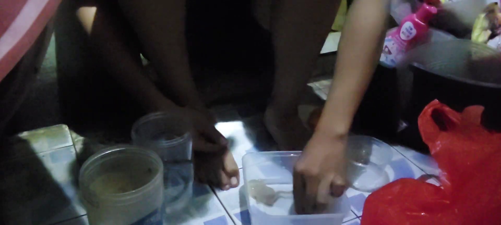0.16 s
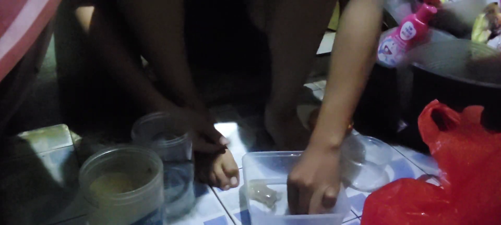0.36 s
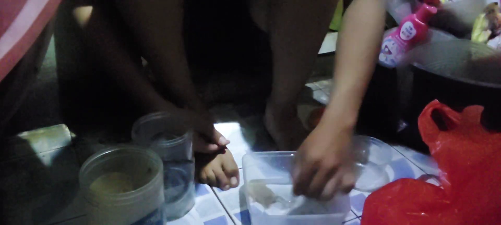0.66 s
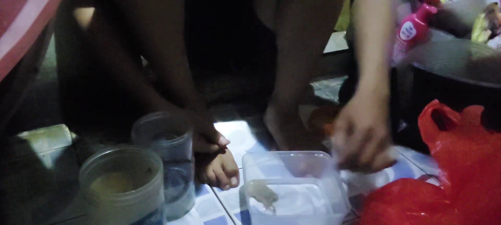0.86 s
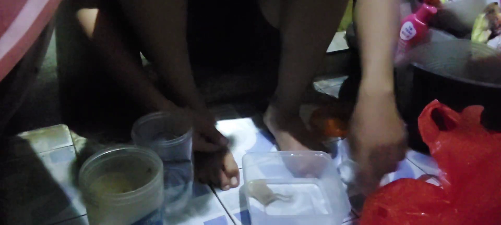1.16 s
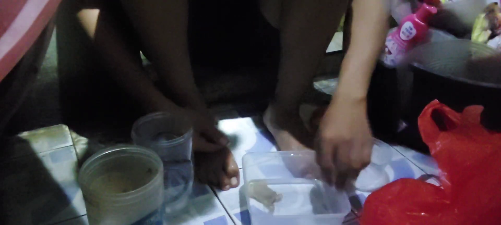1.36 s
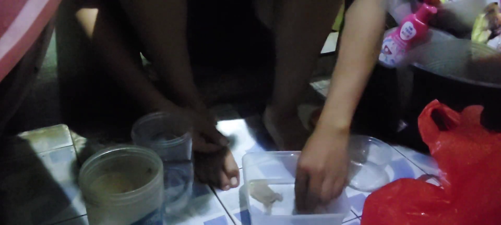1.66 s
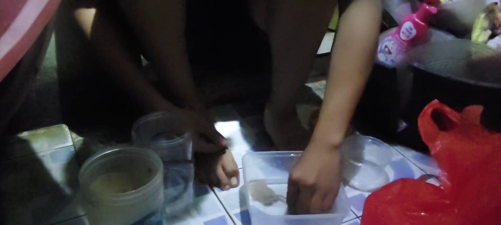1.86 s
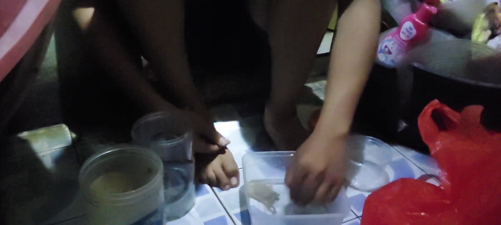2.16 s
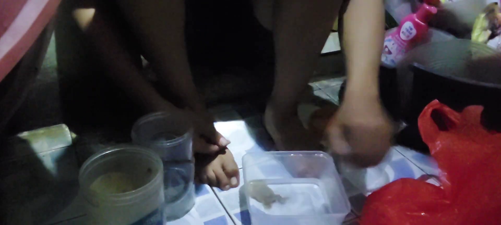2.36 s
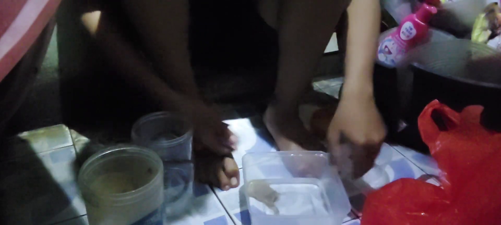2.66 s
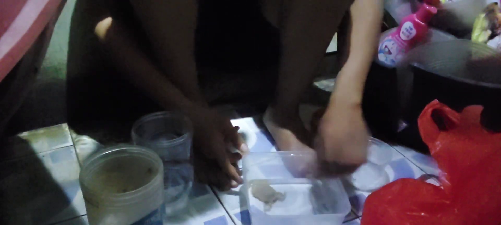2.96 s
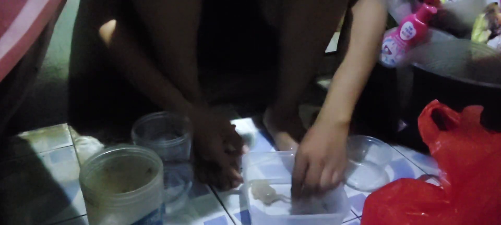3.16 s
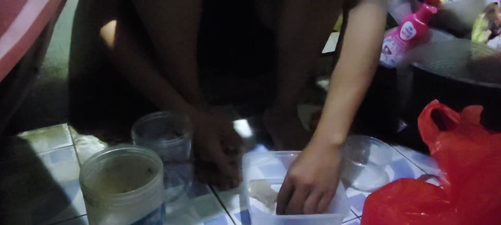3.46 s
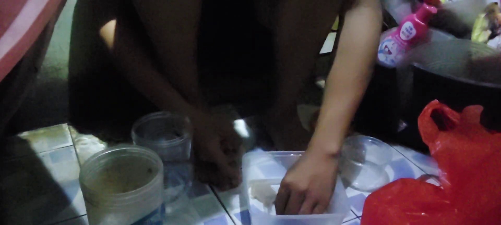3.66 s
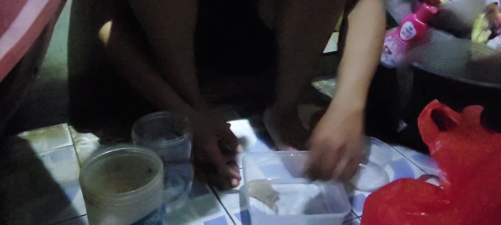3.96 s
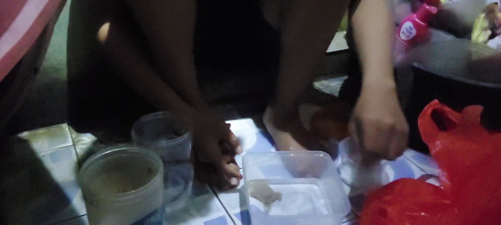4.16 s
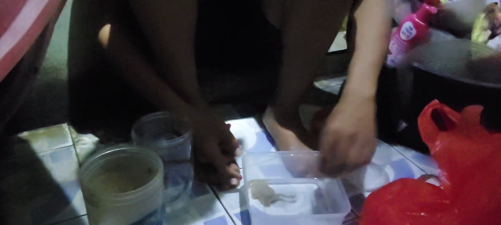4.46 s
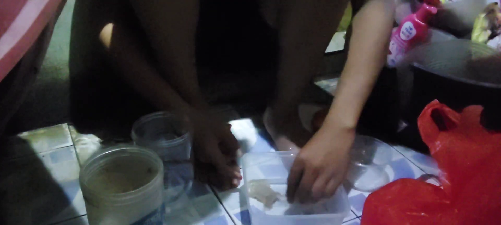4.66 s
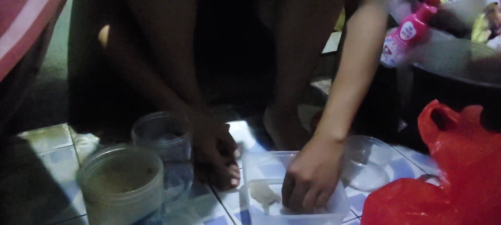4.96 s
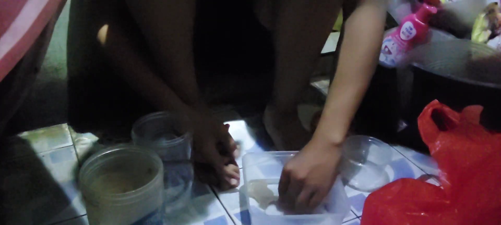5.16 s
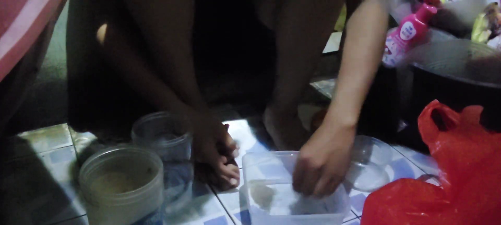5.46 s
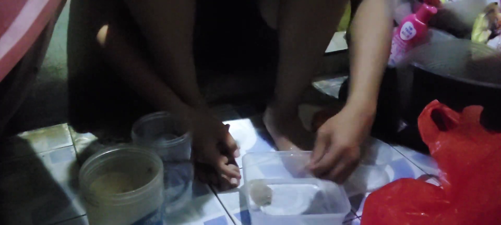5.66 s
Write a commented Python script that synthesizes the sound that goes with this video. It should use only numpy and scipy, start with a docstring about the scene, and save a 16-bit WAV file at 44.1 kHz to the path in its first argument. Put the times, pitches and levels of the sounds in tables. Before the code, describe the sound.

A low, throbbing hum fills a small tiled room from the start: a motorbike passing outside, muffled by the walls. Its tyre noise peaks around 1 second and its drone is loudest near 1.5 seconds. The engine then slows to a deep putter, easing between 3 and 4 seconds. It swells again with a soft rush of noise at about 4.5 seconds and booms unevenly just after 5. Throughout, a cricket holds a thin, high whine, another chirps very faintly far off, and an appliance hums quietly over low room noise. Close by, fingers work softly at a plastic tub: a brush at 0.3 seconds, a light tap near 1, a rustling rub around 2.9, a small tap at 3.7, a sharper click at 4.4, another rub at 5.3 and a faint tick near 5.7.

```python
"""A small tiled room at night. A single-cylinder motorbike rolls past outside, throttles back and putters
on; through the walls its firings excite the room's low standing waves, heard as a hum that swells and
eases, once with a soft rush of noise. Tyre and chain noise leaks in through gaps. An appliance hums.
A cricket's wing strokes ring a resonance in a thin high whine, another calls far off, and fingers brush
and tap a plastic tub."""
import sys
import numpy as np
from scipy import signal
from scipy.fft import rfft, irfft
from scipy.io import wavfile
from scipy.ndimage import uniform_filter1d

SR = 44100
rng = np.random.default_rng(int(sys.argv[2]) if len(sys.argv) > 2 else 0)


def materialize(psi):
    """Save the field psi as 16-bit PCM at rate SR to the path in sys.argv[1].

    A 1-D psi becomes a single channel; in a 2-D psi each row is a channel.
    """
    bounded = np.clip(np.atleast_2d(psi).T, -1, 1)
    quanta = np.round(bounded * 32767).astype(np.int16)
    wavfile.write(sys.argv[1], SR, quanta)


N = 255895
T = np.arange(N) / SR
HZ = np.maximum(np.arange(N // 2 + 1) * SR / N, 1)
IDLE_HZ = 16.6

# Engine speed. Each row: time in seconds, firing rate in Hz.
FIRING_RATE = [(0, 21.3), (.45, 22.7), (1.2, 22.8), (1.33, 20.3), (1.72, 17.6), (2.25, 17.25), (2.7, 16.55),
               (3.8, 16.5), (4.5, 16.1), (4.9, 16.4), (5.8, 16.1)]
# Uneven firing, greatest with the throttle shut.
# Each row: time in seconds, scatter of pulse strength in dB, relative amount of gas rumble.
ROUGHNESS = [(0, .7, .27), (1.7, .7, .18), (3.8, 1.1, .22), (4.9, 2.5, .65)]


def undb(db):
    """Decibels to amplitude ratio."""
    return 10 ** (np.asarray(db) / 20)


def curves(table):
    """Linear interpolation in time of each column after the first."""
    times, *columns = np.transpose(table)
    return [np.interp(T, times, column) for column in columns]


def unit(x):
    """Normalisation to rms 1."""
    return x / np.sqrt(np.mean(x ** 2))


def even(x, size=5000):
    """Gain control: the running rms is held at 1, while faster beats survive."""
    power = uniform_filter1d(uniform_filter1d(np.atleast_2d(x ** 2).mean(0), size), size)
    return x / np.sqrt(power + 1e-18)


def walk(rate_hz):
    """Low-passed noise: a smooth random wandering of rms 1."""
    return unit(irfft(rfft(rng.standard_normal(N)) * np.exp(-(HZ / rate_hz) ** 2), N))


def noise(correlation=0):
    """Partial coherence: left and right noise from a common and an opposed part."""
    mid, side = rng.standard_normal((2, N))
    return np.sqrt((1 + correlation) / 2) * mid + np.sqrt((1 - correlation) / 2) * np.array([side, -side])


def colour(x, spectrum):
    """Spectral shaping by (Hz, dB) points, to rms 1."""
    hz, db = np.transpose(spectrum)
    gain = undb(np.interp(np.log(HZ), np.log(hz), db))
    return unit(irfft(rfft(x) * gain, N))


def ring(x, modes):
    """Forced resonance of steep (Hz, width in Hz, dB) modes, to rms 1."""
    gain = sum(undb(db) / (1 + 1j * (HZ / hz - hz / HZ) * hz / width / 2) ** 2 for hz, width, db in modes)
    return unit(irfft(rfft(x) * gain, N))


def pan(x, left_db):
    """A level difference between the ears gives direction."""
    return x * undb(np.array([[left_db], [-left_db]]) / 2)


def swell(peak_s, rise, decay):
    """A Gaussian rise to 1, then exponential decay."""
    return np.exp(-(np.minimum(T - peak_s, 0) / rise) ** 2 - np.maximum(T - peak_s, 0) / decay)


def still_air():
    """A diffuse field of rumble and hiss: long waves reach both ears alike, short ones do not."""
    # Each row: frequency in Hz, relative spectral density in dB.
    spectrum = [(20, -41), (42, 5.5), (62, 6), (100, -0.5), (150, -10), (200, -8.5), (330, -9),
                (500, -21.5), (1200, -25), (2500, -37), (4500, -39.5), (6300, -37), (9700, -43),
                (10400, -45), (15500, -43.5)]
    coherence = 1 / (1 + (HZ / 380) ** 2)
    common = rfft(noise(correlation=1)) * np.sqrt(coherence)
    separate = rfft(noise()) * np.sqrt(1 - coherence)
    return pan(colour(irfft(common + separate, N), spectrum), left_db=0.5) * undb(-34)


def appliance():
    """Random amplitude and frequency modulation make the tones of a hum waver."""
    # Each row: frequency in Hz, mean level in dB.
    tones = [(344.2, -45.5), (295.8, -49), (526, -71)]
    hum = 0
    for hz, db in tones:
        amplitude = np.sqrt(2) * undb(db + 2 * walk(14))
        hum += amplitude * np.sin(2 * np.pi * np.cumsum(hz + 3 * walk(9.43)) / SR)
    return pan(hum, left_db=-4)


def chirp_train(first_s, rate_hz, jitter_s, scatter_db):
    """Nearly periodic calling: each chirp's time in seconds and relative level in dB."""
    beats = np.arange(first_s, T[-1], 1 / rate_hz)
    late, loud = rng.standard_normal((len(beats), 2)).T
    return zip(beats + jitter_s * late, scatter_db * loud)


def far_cricket(hz=4107, width_hz=12):
    """Interference of many reflections makes a slowly repeated, narrow note grainy."""
    chirps = chirp_train(first_s=.31, rate_hz=2.48, jitter_s=.015, scatter_db=1.5)
    envelope = sum(undb(-64.5 + db) * swell(s, rise=.06, decay=.13) for s, db in chirps)
    note = even(ring(noise(correlation=.4), [(hz, width_hz, 0)]), size=2500)
    return pan(note * envelope, left_db=4)


def tiles(x, t60):
    """Reverberation: dense reflections off hard walls, different at each ear, comb the spectrum."""
    t = T[:SR // 2]
    tail = rng.standard_normal((2, len(t))) * np.exp(-np.log(1000) * t / t60)
    tail /= np.sqrt(np.sum(tail ** 2, axis=1, keepdims=True))
    return signal.fftconvolve(x[None], tail, axes=1)[:, :N]


def near_cricket(chorus_db=-55, rasp=0.12, stroke_hz=80, half_length_s=.03):
    """Rasping strokes drive a broad wing resonance; reverberation smears the chirps into a whine."""
    # Wing resonance. Each row: frequency in Hz, relative spectral density in dB.
    wings = [(6000, -36), (6750, -25.5), (7020, -14), (7350, -7.5), (7720, -5.5), (7950, -16.5),
             (8250, -27.5), (9000, -66)]
    # Calling effort. Each row: time in seconds, level in dB before reverberation.
    effort = [(0, -45.5), (1.8, -43), (3.3, -47), (4.4, -43.5), (5.8, -46.5)]
    (effort_db,) = curves(effort)
    chirps = chirp_train(first_s=.064, rate_hz=8.925, jitter_s=.005, scatter_db=.6)
    power = sum(undb(2 * db) * np.exp(-((T - s) / half_length_s) ** 2) for s, db in chirps)
    power *= undb(2 * effort_db)
    stroke_rate = stroke_hz * (1 + 0.106 * walk(17.5))
    strokes = 1 + rasp * np.sin(2 * np.pi * np.cumsum(stroke_rate) / SR)
    song = colour(noise(), wings) * np.sqrt(power * strokes ** 2 + undb(2 * chorus_db))
    return pan(song + .4 * tiles(song.sum(0), t60=.2), left_db=-1)


def fingers_and_rush():
    """Band-limited noise bursts. The one at 4.52 s is a soft mid-pitched rush that swells with the
    motorbike's drone; the rest are friction and taps of fingers on a plastic tub and bag."""
    # Each row: peak time in seconds, level in dB, rise and decay in seconds, centre and width in Hz.
    bursts = [(.28, -44.5, .08, .16, 1250, 350), (.955, -44, .004, .03, 3470, 1400),
              (2.80, -54, .025, .13, 11000, 5000), (2.86, -51, 0.046, .12, 4520, 1900),
              (2.90, -47, 0.24, 0.2, 1270, 300), (3.39, -61, .005, .04, 12000, 4000),
              (3.722, -45, .01, 0.026, 1260, 348), (4.409, -37.5, .001, 0.012, 6940, 2500),
              (4.411, -42.5, .0048, 0.036, 12400, 6000), (4.52, -51, 0.19, 0.18, 1140, 890),
              (5.27, -49.5, .12, 0.12, 1230, 890), (5.67, -54, .003, 0.014, 12000, 3000),
              (5.70, -62, .0092, .04, 13800, 2480)]
    hiss = noise(correlation=0.21)
    return sum(ring(hiss, [(hz, width, 0)]) * swell(s, rise, decay) * undb(db)
               for s, db, rise, decay, hz, width in bursts)


def passing(near_db, near_s, fall_db, nearest_s=1.05):
    """Spreading loss: the level of a source on a straight path drops fall_db per doubling of distance."""
    return near_db - fall_db * np.log2(np.hypot(1, (T - nearest_s) / near_s))


def tyres_and_chain():
    """Leakage through gaps admits rolling noise, loudest when the bike is nearest."""
    # The noise indoors. Each row: frequency in Hz, relative spectral density in dB.
    spectrum = [(150, -10), (400, 10.5), (480, 9.5), (580, 7.5), (720, -0.5), (1000, 2), (1150, -1.5),
                (1330, 1.5), (1600, -7.5), (2000, -6), (2800, -13), (4500, -17), (7000, -17.5),
                (14000, -39)]
    rolling = colour(noise(correlation=-0.067), spectrum)
    level_db = passing(near_db=-34.5, near_s=0.24, fall_db=3.81) + walk(22)
    return pan(rolling * undb(level_db), left_db=1.5)


def firings(wall_hz=430):
    """Transmission loss: the wall acts as a low-pass filter, rounding each firing's pressure pulse."""
    (rate,) = curves(FIRING_RATE)
    scatter_db, _ = curves(ROUGHNESS)
    cycles = np.cumsum(rate * (1 + .002 * walk(8))) / SR
    onsets = np.flatnonzero(np.diff(np.floor(cycles)))
    pulses = np.zeros(N)
    pulses[onsets] = undb(scatter_db[onsets] * rng.standard_normal(len(onsets)))
    return signal.sosfilt(signal.butter(6, wall_hz, fs=SR, output="sos"), unit(pulses))


def standing_wave(push, modes, lead):
    """Room modes in forced vibration; the left ear leads in phase by lead radians."""
    wave = signal.hilbert(ring(push, modes))
    return np.real(wave * np.exp(.5j * lead * np.array([[1], [-1]])))


def exhaust_overtones(push, passing_s=0.4):
    """Modal coupling depends on source position: the moving bike drives one mode after another."""
    # Each row: frequency and width in Hz, relative level in dB, best time in seconds, swell in dB.
    modes = [(181.75, 6.4, -6, 0.49, 6), (190.5, 9.2, -1, 3.54, 13.5), (210.7, 6.3, -6.5, 2.04, 11.5),
             (227.1, 9.6, -1, 1.86, 5.5), (252, 8.8, -5, 0.15, 11.5), (270.5, 8.9, -6, 0.8, 4),
             (303.1, 12.3, -4, 2.5, 4), (316.55, 13.5, -3, 0.52, 7.5), (350.6, 11.2, -2.5, 1.5, 3.5),
             (380, 21.5, -19, 1.43, 13.5)]
    waves = 0
    for k, (hz, width, db, best_s, swell_db) in enumerate(modes):
        drive_db = db + swell_db * np.exp(-((T - best_s) / passing_s) ** 2)
        waves += standing_wave(push, [(hz, width, 0)], lead=0.49 * (-1) ** k) * undb(drive_db)
    level_db = passing(near_db=-32.5, near_s=1.27, fall_db=7.6) + 1.63 * walk(4.4)
    return pan(even(waves) * undb(level_db), left_db=-4)


def throb(pulses, depth_db=1.94, lead_s=0.013):
    """Amplitude modulation: a gain that crests once per firing when the engine is near idle."""
    beat = ring(pulses, [(IDLE_HZ, 6, 0)])
    return undb(depth_db * np.interp(T + lead_s, T, beat))


def lowest_waves(push, rate, gas):
    """The lowest room resonances gain strength with engine speed and with gas rumble."""
    # Each row: frequency in Hz, width in Hz, relative level in dB.
    modes = [(47.2, 5.4, 11), (34.8, 1.7, -12.5)]
    level_db = -43 + 1.55 * (rate - IDLE_HZ) + 9 * gas + 2.5 * walk(7.8)
    return even(standing_wave(push, modes, lead=0)) * undb(level_db)


def boom(push):
    """Deep room resonances boom as the engine idles."""
    # Each row: frequency in Hz, width in Hz, relative level in dB.
    modes = [(61.44, 10.2, 24.5), (81.65, 3.3, 17), (56.5, 51, -5)]
    # Each row: time in seconds, relative level in dB.
    swells = [(0.0, -31), (1.16, -38), (1.87, -24.5), (3.04, -27.5), (3.67, -39), (3.73, -31),
              (4.94, -24.5), (4.97, -35), (5.15, -20.5), (5.7, -35), (5.8, -28.5)]
    (level_db,) = curves(swells)
    return even(standing_wave(push, modes, lead=-0.32)) * undb(level_db + 1.5)


def drone(push):
    """The strongest standing wave swells and eases as the bike moves."""
    # Each row: frequency in Hz, width in Hz, relative level in dB.
    modes = [(114.26, 6.1, -6.5), (132, 0.9, -13.5)]
    # Each row: time in seconds, relative level in dB.
    swells = [(0.0, -34), (0.55, -23), (0.61, -27.5), (1.13, -18.5), (1.29, -30.5), (1.48, -14.5),
              (1.6, -16), (1.7, -31.5), (1.73, -23), (2.92, -30.5), (3.2, -42.5), (3.91, -30.5),
              (4.18, -42.5), (4.52, -23), (4.65, -27.5), (4.68, -36), (4.83, -27), (4.97, -65), (5.12, -32),
              (5.8, -43)]
    (level_db,) = curves(swells)
    wave = even(standing_wave(push, modes, lead=0.57))
    return pan(wave * undb(level_db + 0.5), left_db=3.5)


def motorbike():
    """Source and filter: firing pulses and gas rumble drive the room's modes, under rolling noise."""
    (rate,) = curves(FIRING_RATE)
    _, gas = curves(ROUGHNESS)
    pulses = firings()
    rumble = gas * noise(correlation=.6)
    hum = (drone(pulses + .5 * rumble) + boom(pulses + 2 * rumble)) * throb(pulses)
    bass = lowest_waves(pulses + rumble, rate, gas)
    return hum + bass + exhaust_overtones(pulses + 2 * rumble) + tyres_and_chain()


def scene():
    """Superposition: the pressures from all the sources add."""
    return motorbike() + appliance() + still_air() + near_cricket() + far_cricket() + fingers_and_rush()


def record(dry, low_hz=33, top_hz=15800):
    """Band limiting removes the deepest rumble and the highest treble."""
    thinned = signal.sosfilt(signal.butter(4, low_hz, "high", fs=SR, output="sos"), dry)
    return signal.sosfilt(signal.ellip(10, .2, 80, top_hz, fs=SR, output="sos"), thinned)


dry = scene()
out = record(dry)
materialize(out)
```